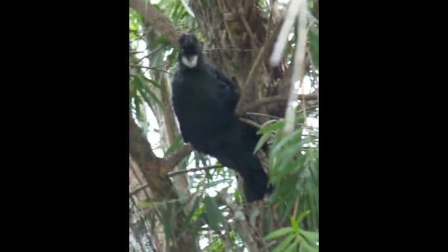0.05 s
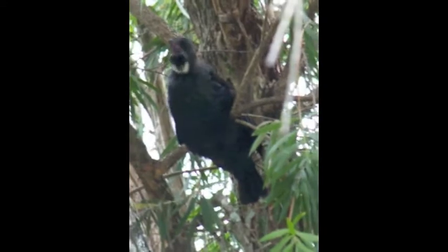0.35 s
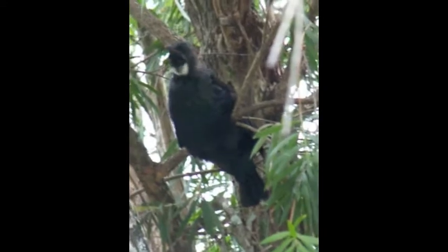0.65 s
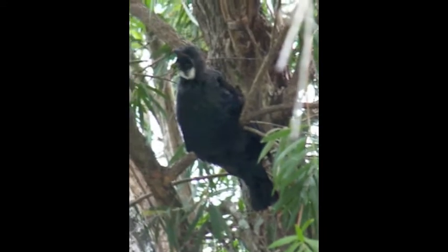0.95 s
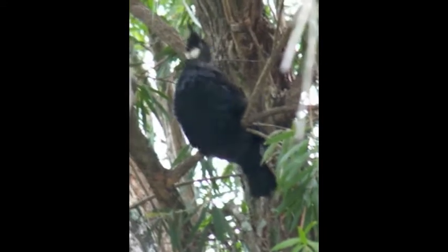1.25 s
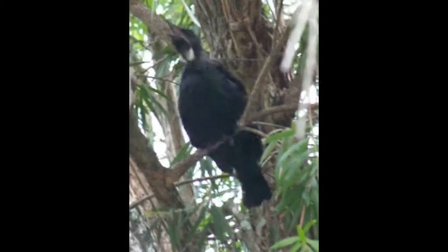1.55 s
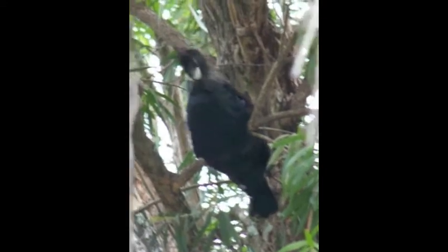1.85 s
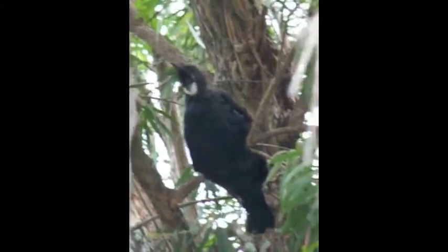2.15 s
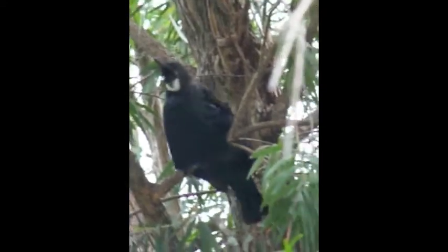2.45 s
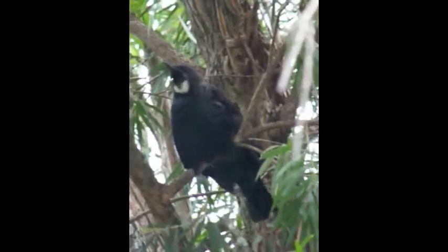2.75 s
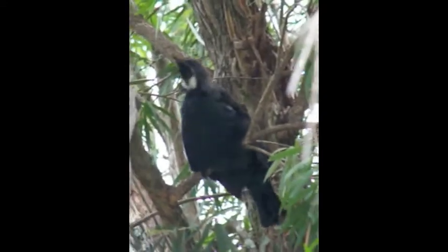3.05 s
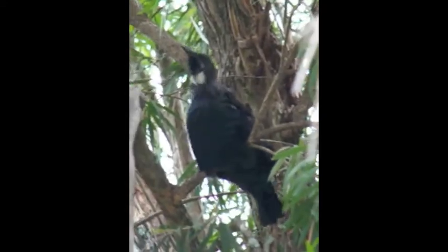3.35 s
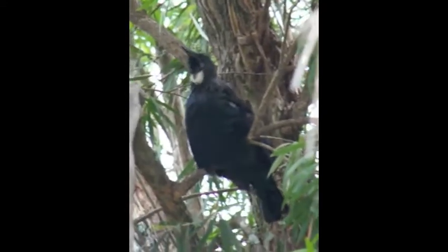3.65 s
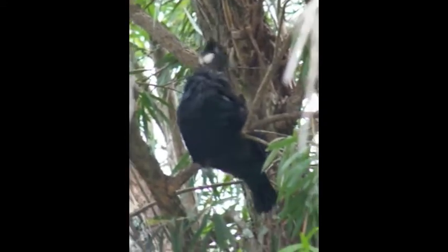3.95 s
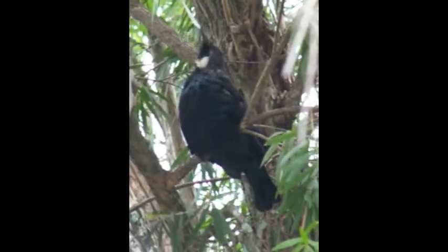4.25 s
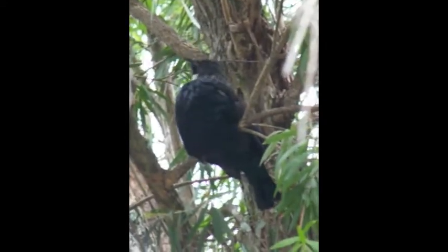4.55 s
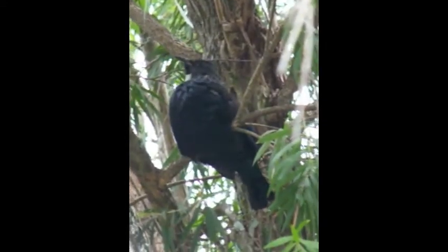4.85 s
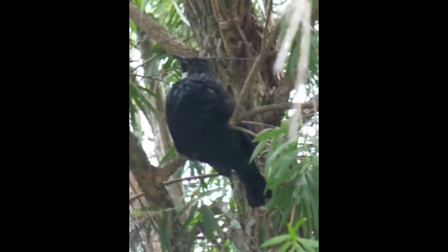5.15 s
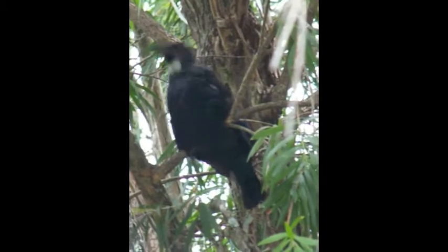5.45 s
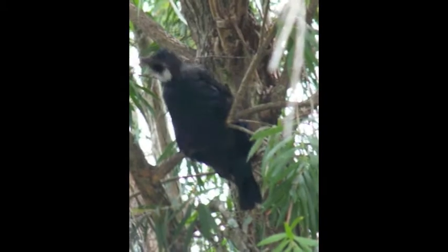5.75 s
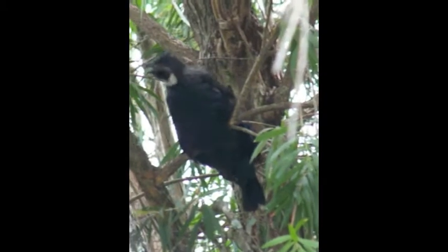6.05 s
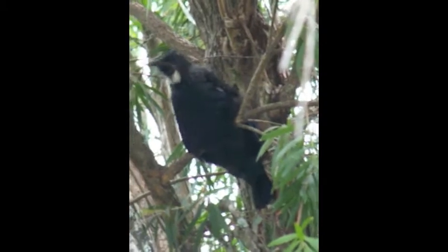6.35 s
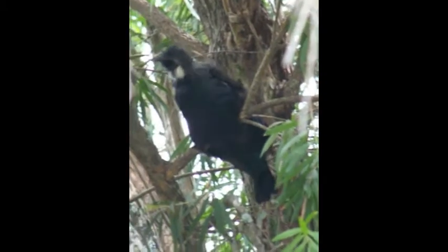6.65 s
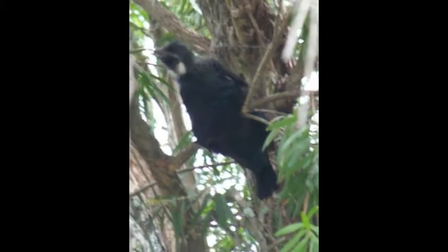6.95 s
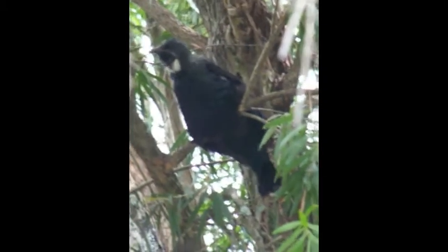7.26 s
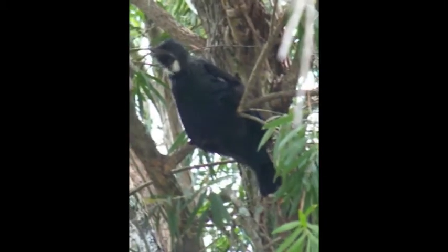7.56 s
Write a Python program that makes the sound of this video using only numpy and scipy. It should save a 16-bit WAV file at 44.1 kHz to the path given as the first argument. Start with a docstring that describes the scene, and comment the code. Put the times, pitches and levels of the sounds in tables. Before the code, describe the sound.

A nearby bird gives quick gliding chirps, harsh coughing squawks and bill clicks among trees, over a soft outdoor hush.

```python
"""Quick gliding chirps from a tui on a branch close to the microphone, then coughs, rasps, a screech,
barks, bill clicks and more chirps. Its syrinx whistles the chirps and buzzes the squawks through the
resonances of throat and bill; in a cough its two sides buzz at different rates. Trunk and foliage
echo it; other birds call far off over a soft outdoor hush and a low hum."""
import sys
import numpy as np
from scipy import signal
from scipy.fft import rfft, irfft
from scipy.io import wavfile
from scipy.ndimage import uniform_filter1d

SR = 44100
rng = np.random.default_rng(int(sys.argv[2]) if len(sys.argv) > 2 else 0)


def wrap_up_sound(samples):
    """Save the sound to the file named by the first command line argument, as 16-bit audio."""
    columns = np.atleast_2d(samples).T
    # keep every value between -1 and 1, then stretch to whole-number steps
    tamed = np.clip(columns, -1, 1)
    steps = np.round(tamed * 32767).astype(np.int16)
    wavfile.write(sys.argv[1], SR, steps)


N = 340011
T = np.arange(N) / SR

# bill resonances in coughs, clicks and barks: f/Hz, gain/dB
BILL_RESONANCES = [(2000, -46), (3400, -17), (4400, -12.5), (5000, -3), (5600, -1.5), (6600, 0.5),
                   (7200, -4.5), (8200, -20), (9000, -25), (10000, -28), (12500, -37), (15500, -46)]
# throat resonances in clicks and barks: f/Hz, gain/dB
THROAT_RESONANCES = [(400, -15), (800, -23), (1220, -24.5), (1450, -20), (1650, -0.5), (1850, -3),
                     (2050, 9), (2350, -10.5), (2700, -4.5), (3100, -9), (3900, -6.5), (4500, -5),
                     (5500, -41.5)]
# throat resonances in the rasps and the screech: f/Hz, gain/dB
HARSH_THROAT = [(400, -33), (800, -14.5), (1100, -19), (1380, -1.5), (1850, 3), (2200, 2.5), (2800, -10.5),
                (3300, -21.5), (4400, -22), (5500, -39.5)]
# bill resonances in the rasps and the screech: f/Hz, gain/dB
HARSH_BILL = [(2000, -46), (3500, -15.5), (4500, -7), (5000, 1), (5600, 2), (6500, 0.5), (7300, -3.5),
              (8300, -8), (9100, -16.5), (9900, -28.5), (11800, -27.5), (15500, -35)]


def undb(db):
    """Decibels to gain."""
    return 10 ** (np.asarray(db) / 20)


def unit(x):
    """Scale to rms 1."""
    return x / np.sqrt(np.mean(x ** 2) + 1e-18)


def wander(rate, size):
    """Smooth random motion of spread 1, turning about `rate` times a second."""
    k = max(int(SR / rate), 1)
    noise = rng.standard_normal(size + 8 * k)
    return unit(uniform_filter1d(uniform_filter1d(noise, k), k))[4 * k:4 * k + size]


def colour(x, points, size=1024):
    """Causal filter through (f/Hz, gain/dB) points that keeps the power of white noise."""
    hz, db = np.transpose(points)
    f = np.maximum(np.fft.rfftfreq(size, 1 / SR), 1)
    cepstrum = irfft(np.log(undb(np.interp(np.log(f), np.log(hz), db))))
    cepstrum[1:size // 2] *= 2
    cepstrum[size // 2 + 1:] = 0
    response = irfft(np.exp(rfft(cepstrum)))
    return signal.fftconvolve(x, response / np.linalg.norm(response))[:len(x)]


def impulses(places, sizes, size, order=6):
    """Band-limited impulses at fractional sample places."""
    out = np.zeros(size)
    taps = np.floor(places).astype(int)[:, None] + np.arange(1 - order, order + 1)
    offset = taps - places[:, None]
    pulses = sizes[:, None] * np.sinc(offset) * np.sinc(offset / order)
    np.add.at(out, np.clip(taps, 0, size - 1), pulses)
    return out


def span(start, length, attack_s=.0005, release_s=.0014):
    """A note's sample indices, its age in seconds and its on-off gate."""
    at = np.flatnonzero((T >= start) & (T < start + length + release_s))
    age = T[at] - start
    return at, age, np.clip(age / attack_s, 0, 1) * np.clip(1 - (age - length) / release_s, 0, 1)


def envelope(start, attack_s, hold_s, release_s, onset_db, end_db):
    """A span whose gate swells from onset_db, holds and fades to end_db."""
    corners = np.cumsum([0, attack_s, hold_s, release_s])
    at, age, gate = span(start, corners[-1])
    return at, age, gate * undb(np.interp(age, corners, [onset_db, 0, 0, end_db]))


def chirp_notes():
    """Each whistle glides along a parabola; its partials move from soft levels to a crest and back."""
    # t/s, rise/s, fall/s, start f/Hz, crest f/Hz, end f/Hz, fundamental/dB, octave/dB, roughness/0-1
    whistles = [(0.011, 0.057, 0.022, 1580, 3200, 2564, -40, -15, 0.086),
                (0.094, 0.025, 0.032, 1470, 1665, 1406, -18.5, -41.5, 0.048),
                (0.139, 0.027, 0.018, 1584, 1990, 1970, -33.5, -39, 0.11),
                (0.187, 0.026, 0.051, 2960, 2772, 1630, -67, -17, 0.31),
                (0.266, 0.01, 0.039, 3375, 2997, 1670, -52, -15, 0.37),
                (0.348, 0.022, 0.038, 3390, 2770, 1500, -38.5, -16, 0.43),
                (0.401, 0.046, 0.017, 3170, 3048, 2830, -28, -26, 0.75),
                (0.523, 0.006, 0.008, 3340, 3330, 3100, -44, -34, 0.3),
                (0.517, 0.033, 0.032, 4390, 4450, 4400, -27, -60, 0.091),
                (0.577, 0.042, 0.052, 4240, 4145, 3610, -34, -70, 0.1),
                (0.606, 0.023, 0.037, 3380, 2790, 2570, -42, -57, 0.1),
                (5.51, 0.056, 0.076, 4630, 2983, 2610, -55.5, -32.5, 0.15),
                (5.517, 0.019, 0.021, 3940, 4165, 4470, -62, -25, 0.08),
                (5.736, 0.017, 0.018, 4580, 3830, 4000, -45, -31, 0.28),
                (5.763, 0.0062, 0.0077, 3790, 3190, 3160, -70, -23.5, 0.31),
                (5.818, 0.022, 0.033, 4250, 3610, 3240, -50.5, -21.5, 0.15),
                (5.88, 0.011, 0.026, 4200, 4235, 3930, -31, -49, 0.08),
                (5.907, 0.022, 0.041, 4180, 3730, 4080, -50, -23.5, 0.06),
                (5.978, 0.022, 0.014, 5210, 4860, 4430, -40, -62, 0.05),
                (6.006, 0.045, 0.0084, 4350, 3106, 2930, -65, -23.5, 0.08),
                (6.055, 0.029, 0.045, 3053, 2930, 2540, -33.5, -29.5, 0.042),
                (6.955, 0.007, 0.016, 2980, 2740, 2450, -70, -37.5, 0.86),
                (6.984, 0.065, 0.016, 2420, 2300, 2320, -51.5, -26.5, 0.045),
                (7.088, 0.022, 0.02, 3400, 2924, 2994, -49, -29.5, 0.067),
                (7.114, 0.043, 0.0096, 3070, 2080, 1910, -28, -48, 0.08),
                (7.663, 0.012, 0.014, 2160, 2570, 2800, -50, -25, 1),
                (7.676, 0.04, 0.019, 2824, 3003, 3014, -66, -12.5, 0.065)]
    for s, rise_s, fall_s, start_hz, crest_hz, end_hz, first_db, octave_db, rough in whistles:
        at, age, gate = span(s, rise_s + fall_s, attack_s=.00057, release_s=.0073)
        corners, rising = [0, rise_s, rise_s + fall_s], age < rise_s
        hz = np.polyval(np.polyfit(corners, [start_hz, crest_hz, end_hz], deg=2), age)
        slack = np.where(rising, .72, .67) * np.interp(age, corners, [1, 0, 1]) ** 1.43
        soft_first_db, soft_octave_db = np.where(rising, -46.5, -60), np.where(rising, -44, -45)
        first_db += slack * (soft_first_db - first_db)
        octave_db += slack * (soft_octave_db - octave_db)
        yield at, gate, hz, first_db, octave_db, rough


def chirps(waver=.0085, jitter=.058, flutter=.71, hiss_db=-22, overtone_db=-29):
    """Close, gliding whistles; the open bill favours the octave, and rough notes flutter and hiss."""
    # the bill's main resonance, which the octave glides through: f/Hz, gain/dB
    main_resonance = [(3000, -15.5), (4600, -8.5), (5400, 0), (6700, 1), (7300, -3.5), (9000, -4.5)]
    # its top resonance, which shapes the third and fourth partials: f/Hz, gain/dB
    top_resonance = [(5000, -6), (8000, 3), (9500, -5), (10800, 4.5), (12300, -4.5), (13500, 4),
                     (15500, -16)]
    out, air = np.zeros((2, N))
    for at, gate, hz, first_db, octave_db, rough in chirp_notes():
        bend = waver * wander(193.4, len(at)) + jitter * rough * wander(1770, len(at))
        phase = 2 * np.pi * np.cumsum(hz * (1 + bend)) / SR
        drive_db = np.maximum(first_db - 5, octave_db) + overtone_db
        levels = [first_db, octave_db + np.interp(2 * hz, *np.transpose(main_resonance))]
        levels += [drive_db + np.interp(k * hz, *np.transpose(top_resonance)) for k in (3, 4)]
        tone = sum(undb(db) * np.sin(k * phase) * (k * hz < SR / 2) for k, db in enumerate(levels, 1))
        out[at] += np.sqrt(2) * gate * tone * (1 + flutter * rough * wander(900, len(at)))
        air[at] += gate * rough * undb(octave_db + hiss_db) * rng.standard_normal(len(at))
    return out + colour(air, [(1500, 1), (3000, 3), (6000, -26), (9000, 1), (15000, -15)])


def trees(x, branches_db, leaves_db, low_t60=.55, high_t60=.5, count=60):
    """Nearby surfaces answer within milliseconds, branches later; foliage scatters a longer tail."""
    # echoes from the surfaces around the perch: delay/s, level/dB
    echoes = [(.0021, -15), (.0028, -15), (.00435, -16), (.00662, -7), (.0106, -19), (.0132, -18)]
    delay, db = np.transpose(echoes)
    t = T[:SR]
    lags = rng.uniform(.000929, .045, count)
    branches = impulses(lags * SR, rng.choice([-1, 1], count) * np.exp(-lags / .22), SR)
    low_shape = [(200, -16), (900, -6), (2000, -6.5), (3200, -3.5), (5000, -22)]
    high_shape = [(1500, -22), (4200, 17.5), (6000, 7.5), (8500, 6.5), (14000, 2)]
    lows = colour(rng.standard_normal(SR), low_shape) * undb(-60 * t / low_t60)
    highs = colour(rng.standard_normal(SR), high_shape) * undb(-60 * t / high_t60)
    leaves = (.78 * lows + highs) * np.minimum(t / .049, 1)
    response = impulses(delay * SR, undb(db), SR)
    response += undb(branches_db) * branches / np.linalg.norm(branches)
    response += undb(leaves_db) * leaves / np.linalg.norm(leaves)
    return x + signal.fftconvolve(x, response)[:N]


def outdoors(hush_db=-50.5, shimmer_db=-66):
    """The bed of the place: a nearly steady hush, a faint high shimmer and a distant machine's hum."""
    # spectrum of the hush: f/Hz, relative level/dB
    hush_shape = [(25, 0), (50, -1.5), (80, 4), (200, -1.5), (500, -4), (1200, -7.5), (2200, -12),
                  (4300, -15), (6200, -9.5), (7400, -15), (10000, -27.5), (15500, -28.5)]
    # tones of the hum: f/Hz, width/Hz, level/dB
    hum_tones = [(50.7, 10.5, -60), (99.8, 0.974, -52), (218, 16.26, -64.5), (573, 9.9, -67.5)]
    shimmer_shape = [(6800, -57), (8100, -3.5), (9150, 2.5), (9900, -61)]
    swell_db, flicker_db = .5 * wander(1.5, N), 2 * wander(18, N)
    hush = unit(colour(rng.standard_normal(N), hush_shape, size=8192)) * undb(hush_db + swell_db)
    shimmer = colour(rng.standard_normal(N), shimmer_shape) * undb(shimmer_db + flicker_db)
    hum = np.zeros(N)
    for hz, width, db in hum_tones:
        drifting_hz = hz + width / 2 * wander(2 * width, N)
        hum += undb(db) * np.sqrt(2) * np.sin(2 * np.pi * np.cumsum(drifting_hz) / SR)
    return hush + shimmer + hum


def far_birds(waver=.02):
    """Soft plain notes from trees far off."""
    # t/s, length/s, start f/Hz, end f/Hz, relative level/dB
    calls = [(0.81, 0.13, 3340, 3150, -49.5), (0.898, 0.091, 4080, 3926, -51),
             (4.7, 0.25, 1177, 1143, -54.5), (6.698, 0.029, 415, 428, -47.5),
             (6.741, 0.1, 1300, 1215, -42.5)]
    out = np.zeros(N)
    for s, length, start_hz, end_hz, db in calls:
        at = np.flatnonzero((T >= s) & (T < s + length))
        hz = np.linspace(start_hz, end_hz, len(at)) * (1 + waver * wander(88, len(at)))
        gate = signal.windows.tukey(len(at), .5)
        out[at] += np.sqrt(2) * undb(db) * gate * np.sin(2 * np.pi * np.cumsum(hz) / SR)
    return out


def buzz(notes, throat, bill, sway_db, jitter, shimmer_db, air, trims_db, scatter_s=.00008):
    """The syrinx membranes slap shut once a cycle, unevenly when rough, and ring throat and bill."""
    throat_trim_db, bill_trim_db = trims_db
    low, high, sway = np.zeros((3, N))
    for at, gate, hz, throat_db, bill_db, rough in notes:
        rough = np.broadcast_to(rough, at.shape)
        cycles = np.cumsum(hz * (1 + jitter * rough * wander(872, len(at)))) / SR
        places = np.interp(np.arange(.5, cycles[-1]), cycles, np.arange(len(at)))
        i = places.astype(int)
        strength, lateness = rng.standard_normal((len(i), 2)).T
        sizes = undb(shimmer_db * rough[i] * strength) * np.sqrt(SR / hz[i])
        # slaps land slightly early or late, which blurs the high harmonics first
        slaps = impulses(places + scatter_s * SR * rough[i] * lateness, sizes, len(at))
        # air hisses through, strongest just after each slap
        puff = air * rough * np.exp(-((cycles + .5) % 1)) * rng.standard_normal(len(at))
        low[at] += gate * unit(slaps + .5 * puff) * undb(throat_db + throat_trim_db)
        high[at] += gate * unit(slaps + 2 * puff) * undb(bill_db + bill_trim_db)
        # the membranes' smooth sway gives a clean fundamental, stronger at high pitch
        sway[at] += gate * np.sin(2 * np.pi * cycles) * hz / hz.mean() * undb(sway_db + .5 * throat_db)
    return colour(low, throat) + colour(high, bill) + sway


def coughs(steady_hz=948.5, high_hz=790, low_hz=583.6, drop_after_s=.043, closed_db=-12):
    """One side of the syrinx holds, the other drops and clears; the opening bill lets the treble out."""
    # t/s, bill opening/s, steady hold/s, steady level/dB, dropping hold/s, dropping level/dB, bill/dB
    bursts = [(1.135, 0.017, 0.047, -24, 0.025, -21.5, -19), (3.907, 0.06, 0.042, -29.5, 0.024, -20.5, -17)]
    # throat resonances: f/Hz, gain/dB
    throat = [(400, -46), (600, -10), (760, -29), (950, -3), (1150, -7.5), (1600, 3), (1900, 2), (2500, -2),
              (2900, 0.5), (3300, -11), (4000, -56), (5500, -62)]
    notes = []
    for s, open_s, steady_s, steady_db, drop_s, drop_db, open_db in bursts:
        bill_db = lambda age: open_db + closed_db * np.maximum(1 - age / open_s, 0)
        at, age, gate = envelope(s, .0032, steady_s, .037, onset_db=-3, end_db=-13)
        notes.append((at, gate, np.full(len(at), steady_hz), steady_db, bill_db(age) - 3, .252))
        at, age, gate = envelope(s + .005, .027, drop_s, .072, onset_db=-5.5, end_db=-17.5)
        dropped = 1 / (1 + np.exp((drop_after_s - age) / .009))
        hz = high_hz + dropped * (low_hz - high_hz)
        rough = np.interp(dropped, [0, 1], [.7, .27])
        notes.append((at, gate, hz, drop_db - 2 * dropped, bill_db(age), rough))
    return buzz(notes, throat, BILL_RESONANCES,
                sway_db=-46.5, jitter=.086, shimmer_db=7, air=1.6, trims_db=(-3.5, -.5))


def clicks(throat_db=-5, crack_db=-14):
    """Sharp snaps of the bill, mostly within the squawks, ring bill and throat."""
    # t/s, level/dB
    bill_snaps = [(1.1373, 3.5), (1.574, -2), (1.609, 6), (1.6176, 3.5), (1.8126, -16), (3.164, -27),
                  (3.1774, -5), (3.908, -12), (3.961, -14), (5.368, -35)]
    s, db = np.transpose(bill_snaps)
    snaps = impulses(s * SR, undb(db), N)
    ring = colour(snaps, BILL_RESONANCES) + undb(throat_db) * colour(snaps, THROAT_RESONANCES)
    return ring + undb(crack_db) * snaps


def rasps(slack_pitch=.12, waver=.03):
    """A long low buzz and a yelp about an octave above waver, and go flat when the effort is low."""
    # t/s, attack/s, hold/s, release/s, start f/Hz, end f/Hz, throat/dB, bill/dB, roughness/0-1
    buzzes = [(1.566, 0.0193, .152, .044, 488.7, 461, -32.5, -22, 0.8),
              (1.579, 0.02003, 0.0138, 0.0232, 851, 948, -21, -16.5, 0.47)]
    notes = []
    for s, attack_s, hold_s, release_s, start_hz, end_hz, throat_db, bill_db, rough in buzzes:
        at, _, gate = envelope(s, attack_s, hold_s, release_s, onset_db=-13.5, end_db=-16)
        bend = waver * rough * wander(120, len(at)) - slack_pitch * (1 - gate)
        hz = np.linspace(start_hz, end_hz, len(at)) * (1 + bend)
        notes.append((at, gate, hz, throat_db, bill_db, rough))
    return buzz(notes, HARSH_THROAT, HARSH_BILL,
                sway_db=-33, jitter=.0956, shimmer_db=2, air=1.3, trims_db=(-1, -1.5))


def screech(start_hz=1568, octaves_per_s=20.8, rough=.24):
    """After the rasps the buzz falls steeply through two octaves, in two surges."""
    # loudness contour: t/s, throat/dB, bill/dB
    surges = [(1.81, -52.5, -14.5), (1.819, -25, -24), (1.831, -10.5, -11.5), (1.848, -24.5, -21),
              (1.879, -18, -24), (1.892, -22, -44), (1.906, -37, -46)]
    s, throat_db, bill_db = np.transpose(surges)
    at, age, gate = span(s[0], s[-1] - s[0])
    hz = start_hz * 2 ** (-octaves_per_s * age)
    note = (at, gate, hz, np.interp(T[at], s, throat_db), np.interp(T[at], s, bill_db), rough)
    return buzz([note], HARSH_THROAT, HARSH_BILL,
                sway_db=-33.5, jitter=.076, shimmer_db=4.5, air=1, trims_db=(-1.5, -.5), scatter_s=.00007)


def barks(start_hz=619, sag_hz_per_s=301, whistle_db=-5.5, waver=.0091):
    """One side of the syrinx buzzes, sagging as the pressure runs down; the other side whistles."""
    # t/s, hold/s, throat/dB, bill/dB, roughness/0-1, whistle f/Hz
    bursts = [(3.165, .028, -17, -17, 0.25, 1998), (3.305, 0.04, -18, -12.5, .27, 2089)]
    notes, whistle = [], np.zeros(N)
    for s, hold_s, throat_db, bill_db, rough, whistle_hz in bursts:
        at, age, gate = envelope(s, .011, hold_s, .028, onset_db=-4, end_db=-19)
        hz = start_hz - sag_hz_per_s * age
        spent_s = np.maximum(age - .011, 0)
        throat_db -= 100 * spent_s
        bill_db -= 130 * spent_s
        notes.append((at, gate, hz, throat_db, bill_db, rough))
        # the buzz chops the whistle into side tones
        chop = 1 + .35 * np.cos(2 * np.pi * np.cumsum(hz) / SR)
        phase = 2 * np.pi * np.cumsum(whistle_hz * (1 + waver * wander(190, len(at)))) / SR
        whistle[at] += gate * chop * np.sin(phase) * undb(throat_db + whistle_db)
    return whistle + buzz(notes, THROAT_RESONANCES, BILL_RESONANCES,
                          sway_db=-26, jitter=.101, shimmer_db=5, air=2.8, trims_db=(-1.5, -3))


def scene(far_db=-3, lowest_hz=330):
    """The bird close to the microphone; its distant neighbours carry more echo from the foliage."""
    bird = chirps() + coughs() + clicks() + rasps() + screech() + barks()
    # so small a body radiates no bass
    bird = signal.sosfilt(signal.butter(2, lowest_hz, "high", fs=SR, output="sos"), bird)
    close = trees(bird, branches_db=-14, leaves_db=-17)
    distant = undb(far_db) * trees(far_birds(), branches_db=-4.5, leaves_db=-8.5)
    return (close + distant + outdoors())[None]


def record(dry, top_hz=15850):
    """The microphone notches two narrow bands steeply and cuts the top."""
    # dips in its response, each applied twice: f/Hz, width/Hz
    dips = [(4840, 313), (7740, 340)]
    for hz, width_hz in 2 * dips:
        dry = signal.lfilter(*signal.iirnotch(hz, hz / width_hz, fs=SR), dry)
    return signal.sosfilt(signal.ellip(10, .2, 80, top_hz, fs=SR, output="sos"), dry)


dry = scene()
out = record(dry)
wrap_up_sound(out)
```